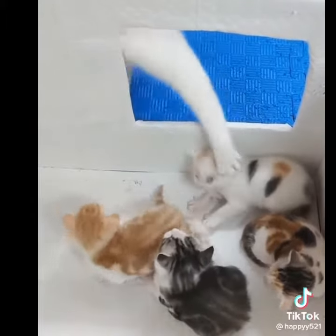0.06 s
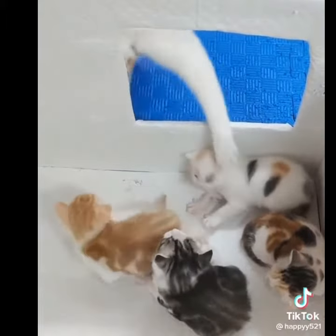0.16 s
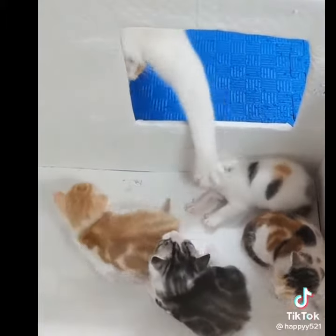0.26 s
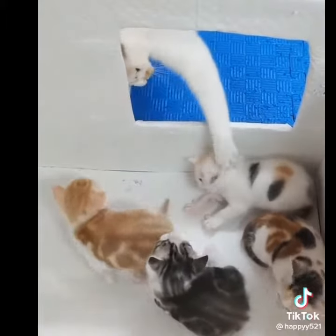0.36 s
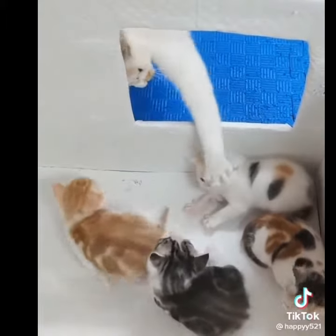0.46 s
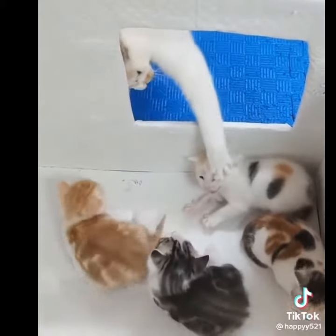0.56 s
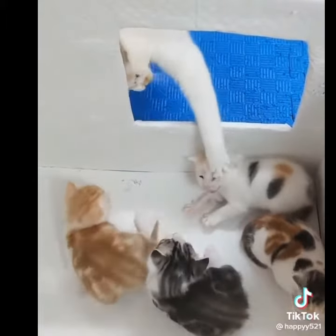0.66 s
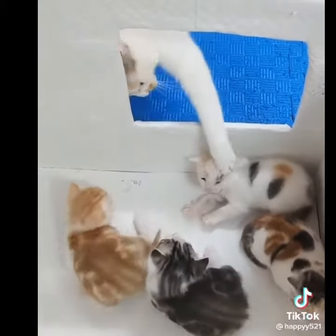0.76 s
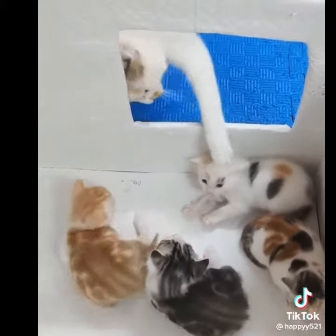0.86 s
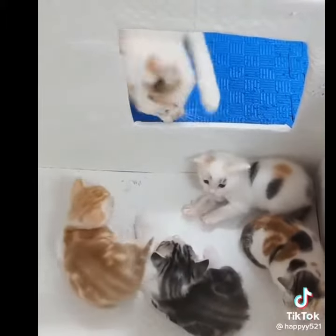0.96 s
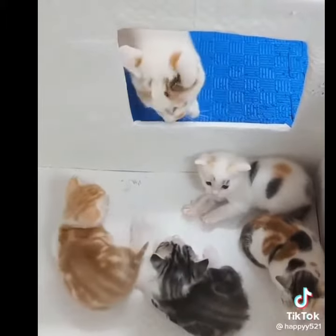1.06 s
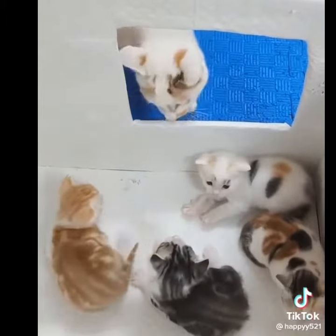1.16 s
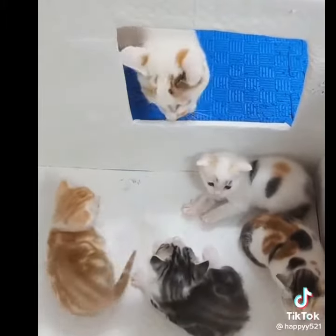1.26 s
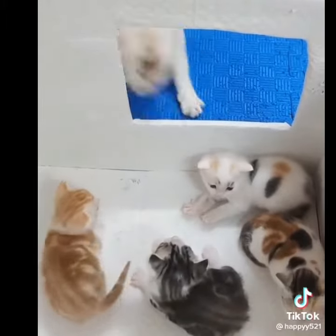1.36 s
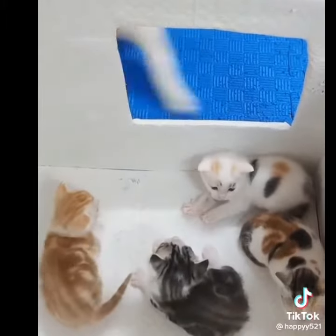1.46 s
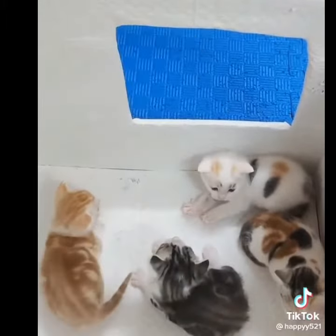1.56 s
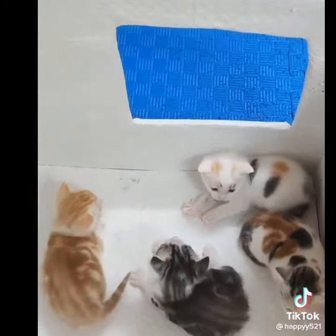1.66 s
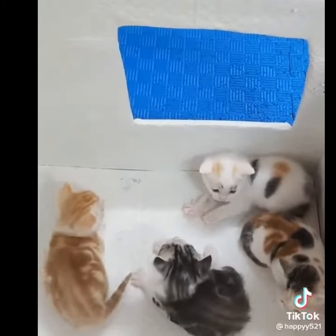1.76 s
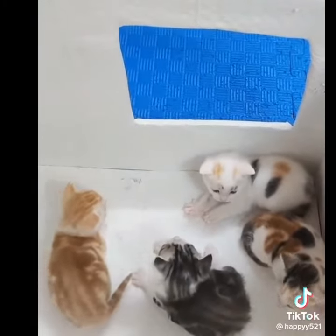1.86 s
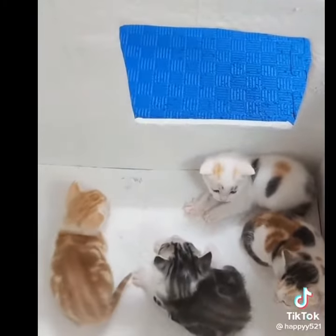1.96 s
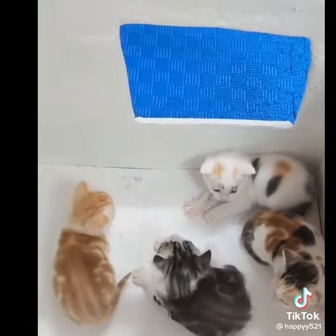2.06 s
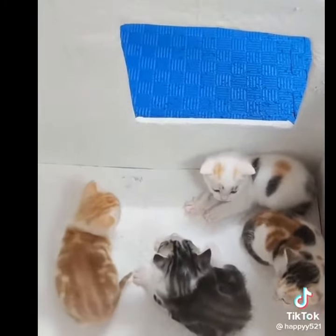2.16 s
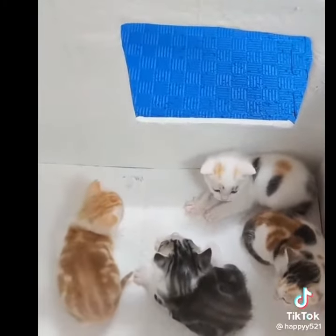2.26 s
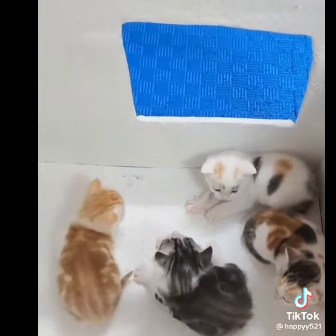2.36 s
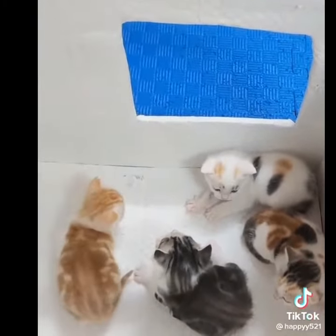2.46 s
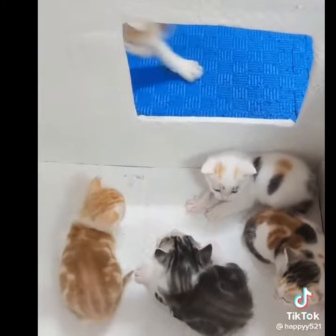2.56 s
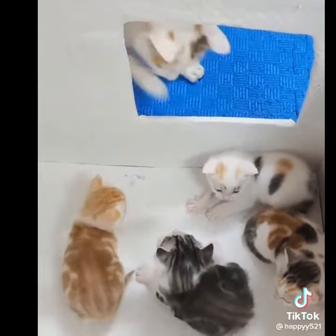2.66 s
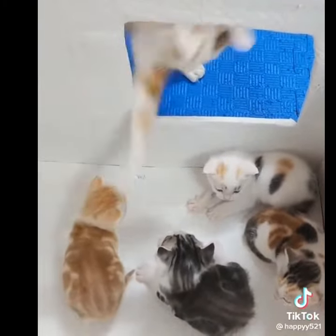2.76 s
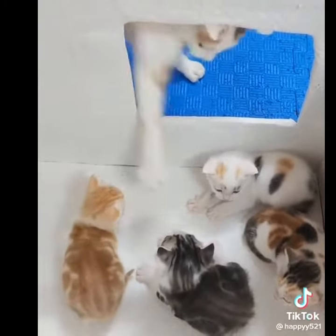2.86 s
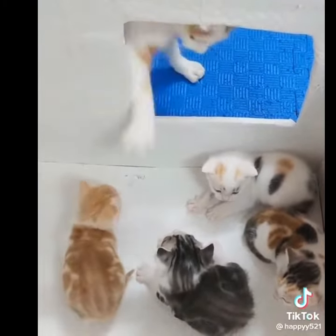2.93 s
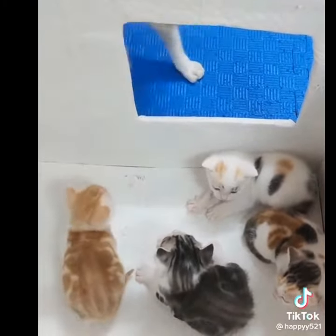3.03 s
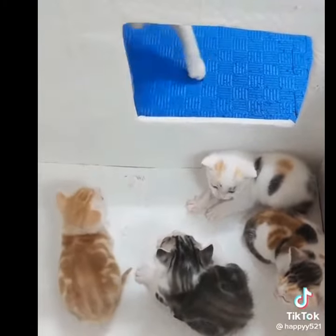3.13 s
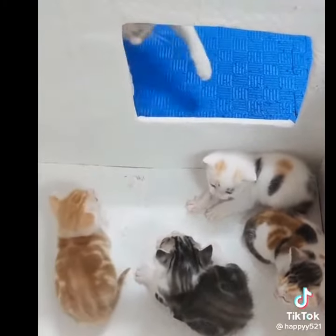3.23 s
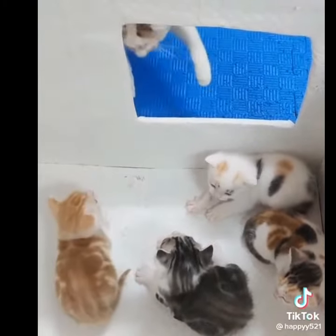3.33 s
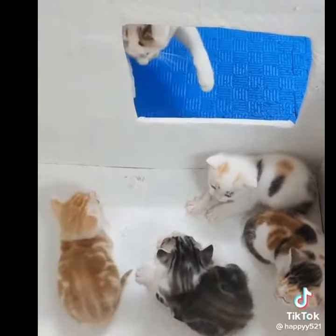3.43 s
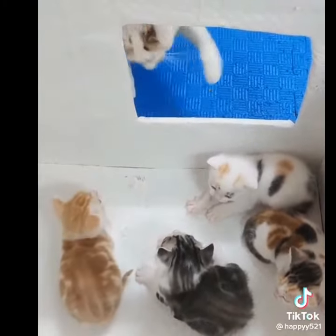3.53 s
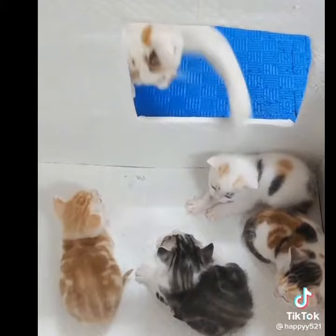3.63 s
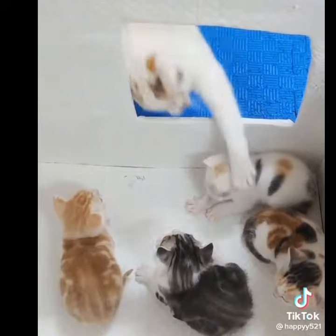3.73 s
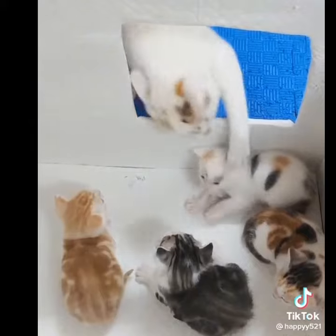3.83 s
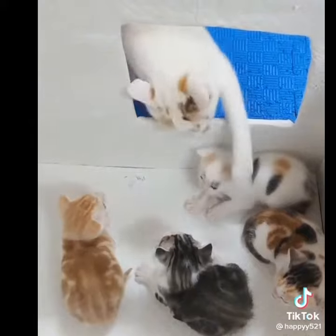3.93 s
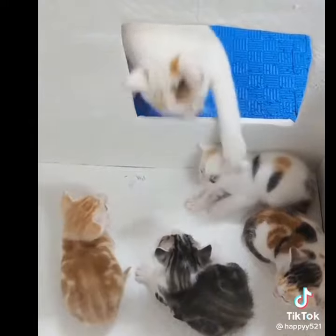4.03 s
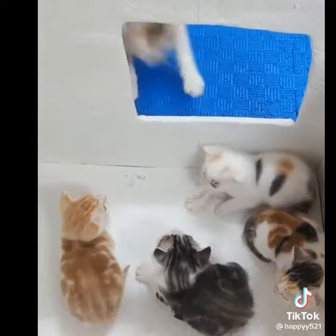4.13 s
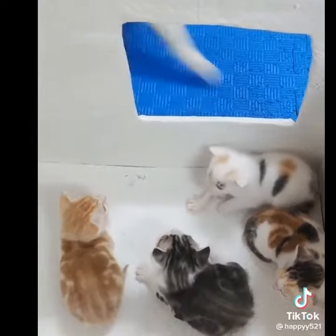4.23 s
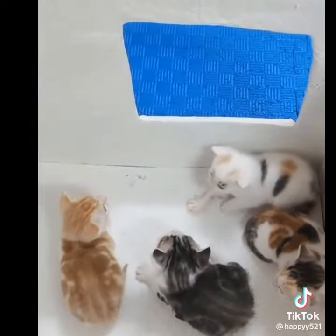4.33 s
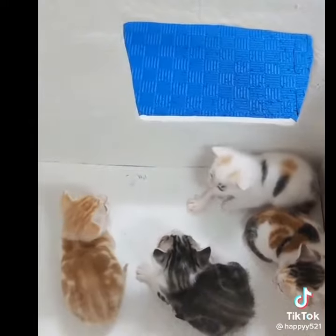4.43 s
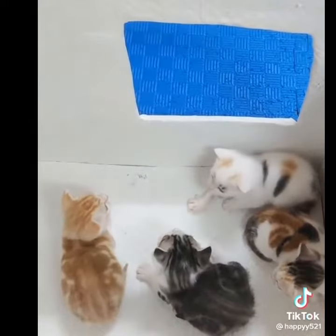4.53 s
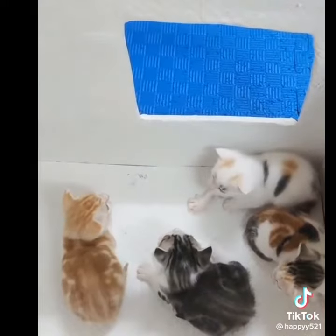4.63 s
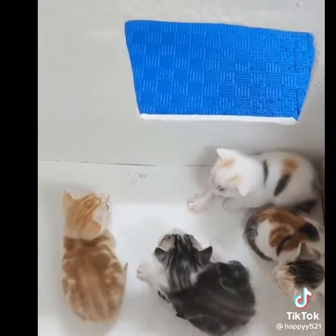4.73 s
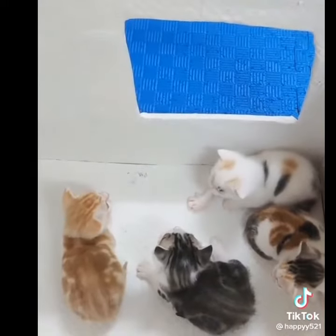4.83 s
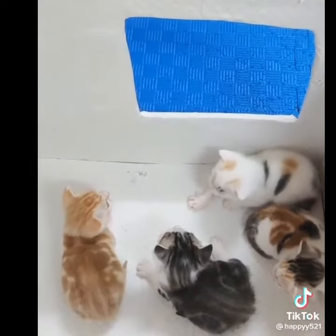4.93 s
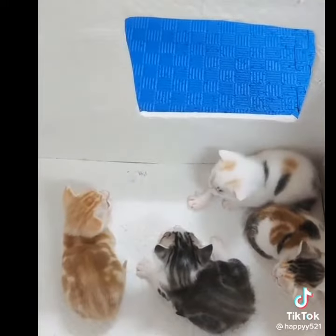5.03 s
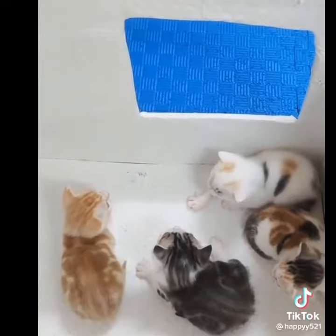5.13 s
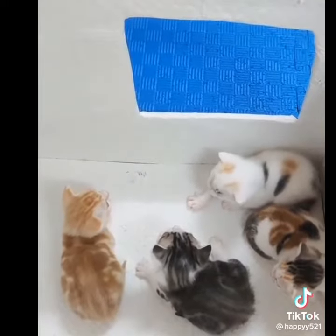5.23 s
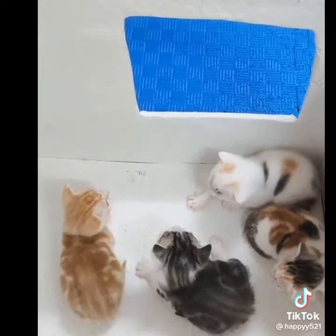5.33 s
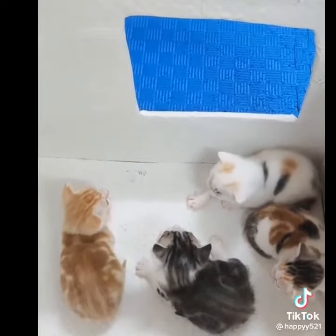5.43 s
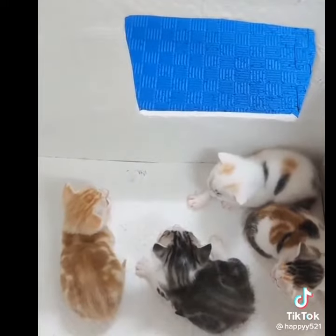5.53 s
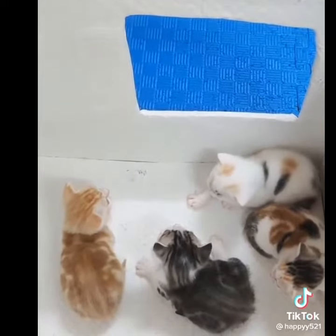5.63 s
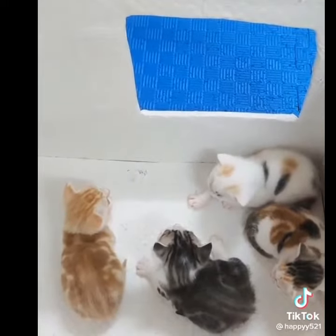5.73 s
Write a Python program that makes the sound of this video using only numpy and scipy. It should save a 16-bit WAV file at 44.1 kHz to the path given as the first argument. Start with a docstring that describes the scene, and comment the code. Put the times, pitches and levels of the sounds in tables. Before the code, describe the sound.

A single microphone over a box picks up dull booming pushes, fine fur hiss and coarse paw rustle in separate bursts. A hollow bump follows the opening thumps, then taps, a quiet gap and a busier scramble. A crisp snap and a loud reverberant knock come near the end, then faint scratchy strokes over wavering low rumble and slight hiss.

```python
"""A soft thump on cardboard, then a bigger boom: a mother cat leans into a large box and paws at her kittens.
Pushes ring the low modes of the box; fur hiss, paw rustle and claw rasps are shaped noise and clicks.
Taps, a hollow bump, a bright claw snap and a hard knock outside the box are decaying sines with reflections.
Light scratching, gated bands of noise, follows over a wavering low indoor rumble with a faint hiss."""
import sys
import numpy as np
from scipy import signal
from scipy.fft import rfft, irfft, next_fast_len
from scipy.io import wavfile
from scipy.ndimage import uniform_filter1d

SR = 44100
rng = np.random.default_rng(int(sys.argv[2]) if len(sys.argv) > 2 else 0)


def dump_mix(stems):
    """Bounce the given channels to the path in sys.argv[1] as a 16-bit WAV at rate SR."""
    frames = np.atleast_2d(stems).T  # one column per channel
    limited = np.clip(frames, -1, 1)  # hard clip at full scale
    pcm = np.round(limited * 32767).astype(np.int16)
    wavfile.write(sys.argv[1], SR, pcm)


N = 255339
T = np.arange(N) / SR  # time [s]

# spectrum of fur brushing and of torn fibres: (frequency [Hz], relative level [dB])
FUR_SPECTRUM = [(400, -1), (1200, 6.5), (2300, -0.5), (3200, 2), (4600, 0.5), (6000, 3.5), (7300, 4.5),
                (8400, -6), (9800, 0.5), (12000, 0), (15500, -3.5)]
TAP_RING_CYCLES = 5.7  # a tap dies away by 60 dB in this many cycles, so high ones are the shortest


def undb(db):
    """Decibels to gain."""
    return 10 ** (np.asarray(db) / 20)


def unit(x):
    """Scale to rms 1."""
    return x / np.sqrt(np.mean(x ** 2))


def curve(rows):
    """Gain along (time [s], level [dB]) rows, at -120 dB outside them."""
    s, db = np.transpose(rows)
    return undb(np.interp(T, s, db, left=-120, right=-120))


def colour(x, points):
    """Filter x by (frequency [Hz], level [dB]) points, then scale it to rms 1."""
    hz, db = np.transpose(points)
    size = next_fast_len(N)
    f = np.maximum(np.fft.rfftfreq(size, 1 / SR), 1)
    gain = undb(np.interp(np.log(f), np.log(hz), db))
    return unit(irfft(rfft(x, size) * gain, size)[:N])


def fade(t, t60):
    """Free decay: 60 dB in t60 seconds."""
    return np.exp(-np.log(1000) * t / t60)


def convolve(x, response):
    """Pass x through an impulse response."""
    return signal.fftconvolve(x, response)[:N]


def lowpass(hz):
    """Second-order low-pass sections."""
    return signal.butter(2, hz, fs=SR, output="sos")


def grains(per_s, spread_db):
    """Fibres catching and slipping: random clicks of uneven size."""
    clicks = (rng.random(N) < per_s / SR) * rng.standard_normal(N)
    return clicks * undb(spread_db * rng.standard_normal(N))


def waver(per_s, depth_db):
    """A gain that wanders between random levels, per_s of them each second."""
    steps = rng.standard_normal(4096)
    return undb(depth_db * np.interp(T * per_s, np.arange(len(steps)), steps))


def tail(t60, build_s):
    """Dense reflections of unit energy that build up and die away."""
    t = T[:SR]
    h = rng.standard_normal(SR) * fade(t, t60) * (1 - np.exp(-t / build_s))
    return h / np.sqrt(np.sum(h ** 2))


def strikes(rows, rise_cycles):
    """Each contact (time [s], peak [dB], pitch [Hz], t60 [ms]) is one decaying sine with a short rise."""
    out = np.zeros(N + SR)
    t = T[:SR // 8]
    for s, db, hz, ring_ms in rows:
        rise = 1 - np.exp(-t * hz / rise_cycles)
        ring = np.sin(2 * np.pi * hz * t) * fade(t, ring_ms * 1e-3) * rise
        start = int(s * SR)
        out[start:start + len(t)] += undb(db) * ring / np.abs(ring).max()
    return out[:N]


def movements(rows, attack_s, release_s):
    """Gain of movements that swell up, hold, then die away; the times are for 60 dB up and 60 dB down."""
    gain = np.zeros(N)
    for s, length, db in rows:
        swell = fade(np.maximum(s - T, 0), attack_s)
        gain += undb(db) * swell * fade(np.maximum(T - s - length, 0), release_s)
    return gain


def hollow(x):
    """Three short fixed delays give the rubbing a slightly hollow, comb-like colour."""
    # delayed copies: (delay [ms], level relative to the direct sound [dB])
    delays = [(1.7, -14.5), (2.9, -16), (4.3, -12.5)]
    copies = sum(undb(db) * np.interp(T - ms / 1000, T, x, left=0) for ms, db in delays)
    return (x + copies) / np.sqrt(1 + sum(undb(db) ** 2 for ms, db in delays))


def room():
    """Indoor background: the low rumble wavers, the faint hiss above it is steadier."""
    # spectrum of the background: (frequency [Hz], relative level [dB])
    floor_spectrum = [(20, -19), (40, -7), (58, 7.5), (85, -2), (125, -4), (175, -11.5), (222, -4),
                      (300, -10.5), (550, -16), (1100, -24), (2000, -34), (4000, -37), (7000, -37),
                      (8400, -44), (10500, -39.5), (15500, -37)]
    # slow course of the background before it wavers: (time [s], level [dB])
    floor_level = [(0, -39), (.7, -40.5), (1.3, -42), (2.4, -41.5), (3.3, -38.5), (3.9, -37.5),
                   (4.5, -38.5), (5.79, -40)]
    air = colour(rng.standard_normal(N), floor_spectrum) * curve(floor_level)
    rumble = signal.sosfiltfilt(lowpass(795), air)
    hiss = air - rumble
    return rumble * waver(per_s=16, depth_db=1.66) + hiss * waver(per_s=13, depth_db=0.65)


def shuffling():
    """Kittens shifting their weight flex the floor of the box with a soft rumble."""
    # spectrum of the flexing floor: (frequency [Hz], relative level [dB])
    flex_spectrum = [(20, -28), (40, 2), (60, 7.5), (90, -3), (130, -4), (200, -13), (300, -21),
                     (900, -39.5), (4000, -83)]
    # weight shifts: (full speed at [s], length [s], level [dB])
    shifts = [(0, 0.12, -29.5), (2.9, .14, -28), (4.43, 0.058, -31.5), (4.72, 0.16, -45),
              (5.09, 0.055, -34.5), (5.7, .09, -44)]
    return colour(rng.standard_normal(N), flex_spectrum) * movements(shifts, attack_s=0.29, release_s=1)


def scratch_strokes():
    """Gain of the scratching: on while a claw moves, off between strokes."""
    # strokes of light scratching: (start [s], end [s], level [dB])
    strokes = [(5.039, 5.063, -53), (5.073, 5.118, -50.5), (5.123, 5.16, -47.5), (5.165, 5.2, -48),
               (5.211, 5.217, -47), (5.272, 5.275, -44), (5.298, 5.337, -51.5), (5.346, 5.384, -50.5),
               (5.491, 5.53, -54.5), (5.63, 5.669, -50), (5.721, 5.793, -49.5)]
    gate = sum(undb(db) * ((T > start) & (T < end)) for start, end, db in strokes)
    return uniform_filter1d(gate, size=150)  # softens the edges over 150 samples


def scratching():
    """Claws stick and slip in short strokes: a hiss whose level flutters at random."""
    # spectrum of claws on board: (frequency [Hz], relative level [dB])
    claw_spectrum = [(2500, -30), (3700, -8), (4300, 7), (5200, 4.5), (6300, -11), (7600, 6), (8300, -15),
                     (14000, -11)]
    slips = unit(waver(per_s=330, depth_db=3))
    return colour(rng.standard_normal(N), claw_spectrum) * slips * scratch_strokes()


def rubbing():
    """Fur gives a fine hiss, dragging paws a coarser rustle that the walls smear."""
    # strokes of fur along the cardboard: (full speed at [s], length [s], level before the final mix [dB])
    fur_strokes = [(0, 0.0082, -50.5), (.135, 0.052, -56.5), (.225, .04, -51), (.33, 0.038, -54),
                   (.45, .015, -63.5), (.525, .02, -57), (.74, 0.081, -54), (.955, 0.11, -55),
                   (1.447, 0.026, -44.5), (1.525, 0.066, -52.5), (1.68, 0.039, -54.5), (1.86, .02, -58),
                   (2.725, 0.012, -55), (2.9, 0.037, -50.5), (2.985, 0.076, -50), (3.13, .11, -58.5),
                   (3.84, 0.068, -52), (4.1, 0.073, -53), (4.195, .015, -47.5), (4.255, 0.049, -42.5),
                   (4.45, 0.017, -49), (4.755, 0.068, -55), (4.92, .05, -58.5)]
    # paws dragging along the wall: (full speed at [s], length [s], level before the final mix [dB])
    paw_drags = [(.1, .015, -46), (.235, .03, -52), (.52, .015, -49), (.735, 0.012, -47),
                 (1.465, 0.034, -46.5), (1.55, .042, -39.5), (1.86, .07, -52.5), (1.985, .01, -51),
                 (2.72, 0.047, -51), (2.905, 0.022, -42), (3, .05, -52), (3.145, .03, -46),
                 (3.235, .02, -48.5), (3.345, .02, -56), (3.855, 0.047, -41.5), (4.1, 0.055, -46),
                 (4.45, .03, -53), (4.94, .03, -53), (5.66, .012, -44.5)]
    # spectrum of a dragging paw: (frequency [Hz], relative level [dB])
    drag_spectrum = [(150, 6.5), (350, 9), (650, 8), (900, -7), (1500, 5), (2200, -8), (3200, -7),
                     (5000, -13), (10000, -28)]
    brushing = movements(fur_strokes, attack_s=0.17, release_s=0.3)
    brushing = brushing + undb(-8) * scratch_strokes()  # fur brushes along with a scratching claw
    fur = colour(grains(per_s=12000, spread_db=-0.5), FUR_SPECTRUM)
    fur = fur * waver(per_s=60, depth_db=3.5) * brushing
    pressure = waver(per_s=90, depth_db=2.6)
    paws = colour(grains(per_s=3000, spread_db=1.5), drag_spectrum)
    paws = paws * pressure * movements(paw_drags, attack_s=0.11, release_s=0.21)
    smear = convolve(paws, tail(t60=0.19, build_s=0.0012))
    return undb(3.5) * fur + undb(-2.5) * paws + undb(-8) * smear


def skids():
    """A skidding claw rasps one band of the board in many tiny slips: a quick start, then it slows to rest."""
    # brief skids: (time [s], level [dB], pitch [Hz], width of each filter pass [Hz], length [ms])
    skid_rows = [(.959, -47, 4200, 4000, 5.1), (1.021, -45, 2900, 700, 46), (1.437, -50, 3100, 700, 57),
                 (1.447, -43.5, 7100, 1800, 44), (1.544, -34, 790, 1200, 16), (1.571, -41.5, 646, 300, 25),
                 (2.651, -43, 7300, 4000, 17), (2.722, -42.5, 610, 300, 25),
                 (2.849, -41.5, 5960, 10300, 7.4), (2.894, -35.5, 666, 150, 29), (2.924, -31, 560, 250, 16),
                 (2.924, -45, 2500, 3000, 4.7), (2.953, -41, 6440, 7000, 4.1),
                 (3.129, -41.5, 1380, 380, 58), (3.129, -46, 2380, 2220, 26), (3.216, -48, 3300, 2400, 7),
                 (3.353, -39.5, 450, 397, 22), (3.846, -42.5, 540, 400, 45), (4.125, -41.5, 1640, 400, 11),
                 (4.568, -50.5, 1940, 1200, 44)]
    out = np.zeros(N)
    for s, db, hz, width, length_ms in skid_rows:
        band = signal.iirpeak(hz, hz / width, fs=SR)
        rasp = signal.lfilter(*band, grains(per_s=4400, spread_db=-2))
        rasp = unit(signal.lfilter(*band, rasp))
        progress = np.clip((T - s) * 1000 / length_ms, 0, 1)
        out += undb(db) * rasp * np.minimum(20 * progress, 1) * np.sqrt(1 - progress)
    return out


def taps():
    """Taps and the bump scatter briefly between the box walls, then faintly in the room."""
    # light taps of paws and claws: (time [s], peak before reflections [dB], pitch [Hz])
    tap_rows = [(.098, -26.5, 516), (.1035, -36, 1300), (1.5156, -22.5, 1440), (1.521, -33, 151),
                (1.5458, -29, 1470), (1.588, -41, 900), (1.862, -38.5, 1540), (2.7239, -31.5, 1380),
                (2.905, -34, 1050), (2.9179, -35, 1800), (2.9553, -25, 2960), (3.0436, -34.5, 1460),
                (3.053, -26.5, 413), (3.1304, -31, 1380), (3.2179, -28.5, 1710)]
    # one hollow bump, the paw first and the weight behind it:
    # (time [s], peak before reflections [dB], pitch [Hz], ring t60 [ms])
    bump = [(.7457, -20, 744, 20), (.7462, -25, 1016, 19), (.7484, -12.5, 188, 18.3),
            (.7488, -27.5, 380, 29)]
    ticks = [(s, db, hz, 1000 * TAP_RING_CYCLES / hz) for s, db, hz in tap_rows]
    dry = strikes(ticks + list(bump), rise_cycles=0.99)
    walls = undb(-9.0) * tail(t60=0.049, build_s=0.0012)
    far_room = undb(-15.5) * tail(t60=0.56, build_s=0.0033)
    return dry + convolve(dry, walls + far_room)


def snap():
    """A claw snaps free of the edge with a bright click and a brief crackle of tearing fibres."""
    # modes of the click: (peak before reflections [dB], pitch [Hz])
    click_modes = [(-10, 6700), (-18, 9900), (-20, 960), (-27, 580)]
    snap_s = 4.0836
    rows = [(snap_s, db, hz, 1000 * TAP_RING_CYCLES / hz) for db, hz in click_modes]
    click = strikes(rows, rise_cycles=0.79)
    burst = (T > snap_s) * fade(np.maximum(T - snap_s, 0), t60=0.013)
    crackle = burst * colour(rng.standard_normal(N), FUR_SPECTRUM)
    dry = click + undb(-21) * crackle
    return dry + undb(-16) * convolve(dry, tail(t60=0.25, build_s=0.002))


def thumps():
    """Soft pushes set the box booming; a longer contact leaves out the higher modes."""
    # paws and body landing on the box: (time [s], strength [dB], contact time [ms])
    landings = [(.004, -13.5, 3.6), (0.0975, 1, 5.7), (0.3184, -7.5, 5.6), (0.3612, -15, 3.2),
                (1.519, -32, 1.2), (2.848, -3.5, 2.3), (2.8939, -7.5, 2.5), (2.911, -15, 2.2),
                (2.973, -6.5, 2.3), (3.011, -12, 1.8), (3.0563, -15.5, 0.95), (3.7988, -3, 3),
                (3.833, -5, 5.8), (4.058, -9, 4.2), (4.0961, -14, 1.1), (4.1256, 0.5, 6.6),
                (4.1697, -15, 2)]
    # modes of the box: (frequency [Hz], relative level [dB], t60 [s], polarity [sign])
    box_modes = [(56.4, -13, 0.11, 1), (80.84, -3, 0.28, 1), (91.4, -3.5, 0.19, -1), (122, 0.5, 0.046, -1),
                 (127.5, -7, 0.097, 1), (146.4, -16, 0.24, -1), (197.7, -16, 0.23, 1),
                 (229.3, -20, 0.25, -1)]
    force = np.zeros(N)
    for s, db, contact_ms in landings:
        near = np.abs(T - s) < .01
        push = np.exp(-(np.pi * (T[near] - s) * 1000 / contact_ms) ** 2)
        force[near] -= undb(db) * push / push.sum()
    t = T[:SR]
    box = np.zeros(SR)
    for hz, db, t60, polarity in box_modes:
        box += np.sign(polarity) * undb(db) * np.sin(2 * np.pi * hz * t) * fade(t, t60)
    boom = convolve(force, box)
    return boom + undb(-33.5) * convolve(boom, tail(t60=0.48, build_s=.03))


def knock():
    """A hard, bright knock outside the box; a dense room reverberation rings on after it."""
    # the knock and its rebounds: (time [s], peak before the low-pass [dB], pitch [Hz], ring t60 [ms])
    blow_rows = [(4.2248, -5, 1410, 3.3), (4.2252, -24, 2650, 1.8), (4.2255, -21, 517, 100),
                 (4.2272, -15.5, 1920, 6.4), (4.2285, -26, 925, 17)]
    # long-ringing modes: (frequency [Hz], starting level [dB], t60 [s])
    long_modes = [(716, -38, .45), (1276, -41, .5), (1605, -35, .25), (1696, -38, .42), (1766, -35, .35),
                  (2008, -39, .42), (2050, -36, .3), (2083, -36, .42), (2417, -44, .45)]
    # spectrum of the noisy reverberation: (frequency [Hz], relative level [dB])
    wash_spectrum = [(150, 3.5), (330, -9.5), (540, -2), (620, -9), (715, -7.5), (1050, -8), (1300, -8),
                     (1730, 1), (1860, -12), (2060, -0.5), (2320, -11), (2500, -7), (2900, -14.5),
                     (3600, -24), (8000, -44)]
    dry = strikes(blow_rows, rise_cycles=0.62)
    dry = signal.sosfilt(lowpass(3300), dry)
    age = np.maximum(T - blow_rows[0][0], 0)
    modes = sum(undb(db) * np.sin(2 * np.pi * hz * age) * fade(age, t60) for hz, db, t60 in long_modes)
    swell = (1 - np.exp(-age / 0.017)) * fade(age, t60=0.42)
    wash = colour(grains(per_s=15000, spread_db=0), wash_spectrum) * swell
    echo = convolve(dry, tail(t60=0.24, build_s=0.0012))
    return dry + modes + undb(-21) * wash + undb(-12.5) * echo


def scene():
    """All sources at one microphone above the box."""
    background = room() + shuffling()
    friction = hollow(rubbing() + scratching()) + skids()
    blows = taps() + snap() + thumps() + knock()
    return (background + friction + blows)[None]


def record(dry):
    """The phone cuts the top of the treble, above 15650 Hz."""
    return signal.sosfilt(signal.ellip(10, .2, 80, 15650, fs=SR, output="sos"), dry)


dry = scene()
out = record(dry)
dump_mix(out)
```